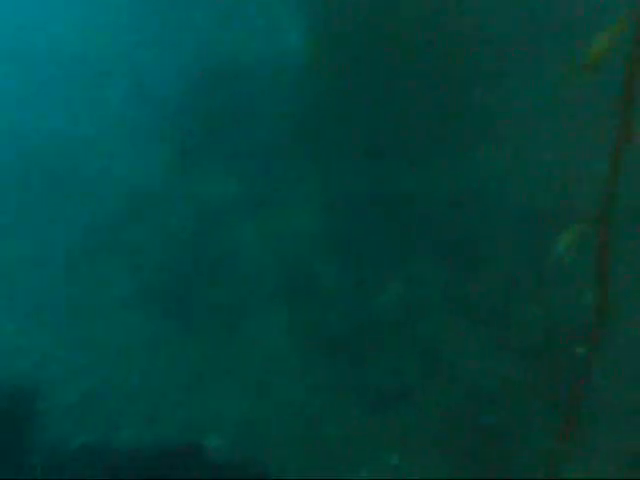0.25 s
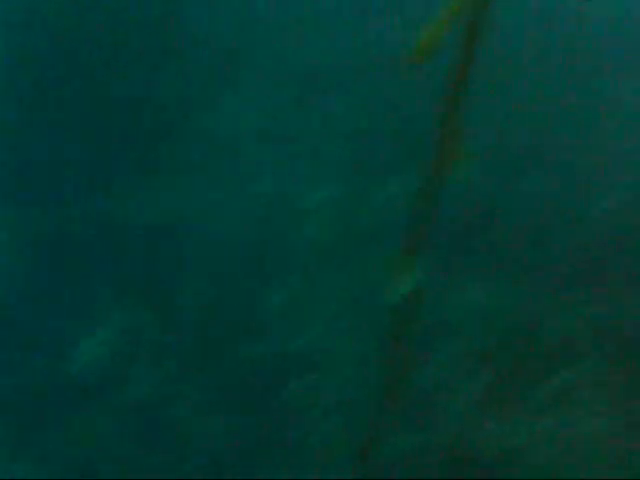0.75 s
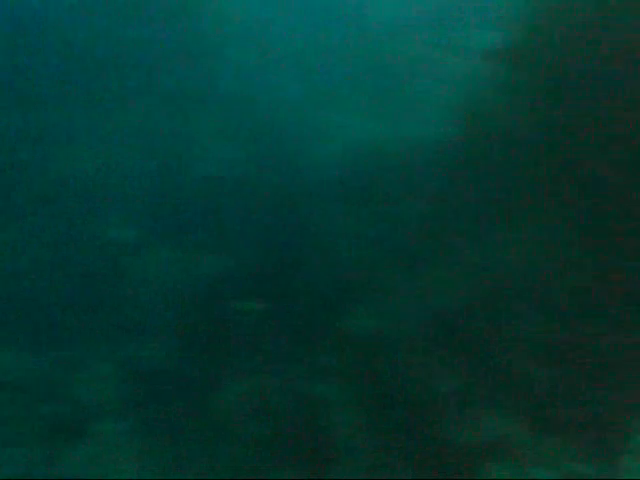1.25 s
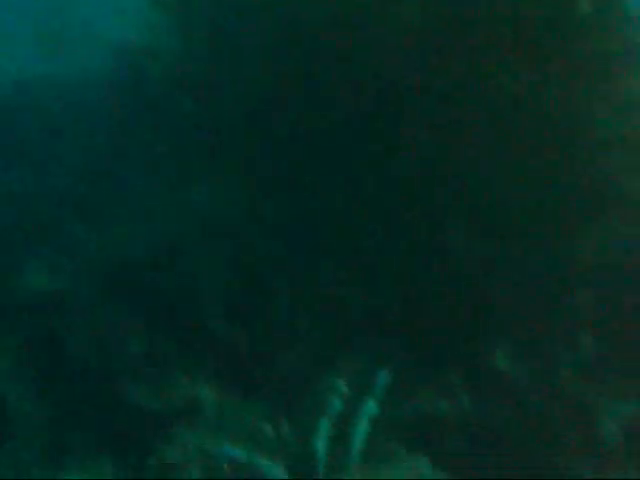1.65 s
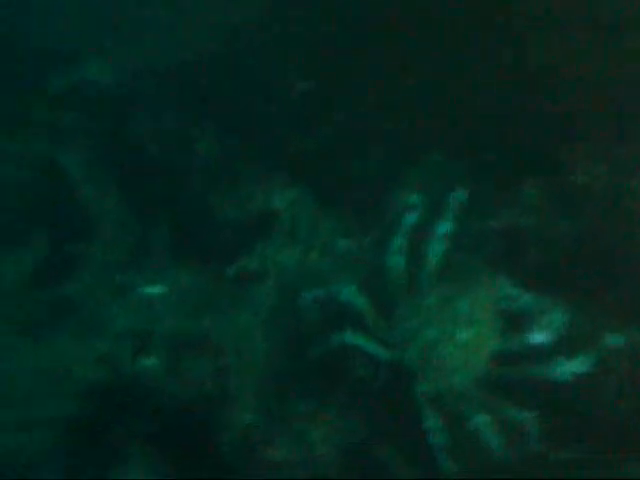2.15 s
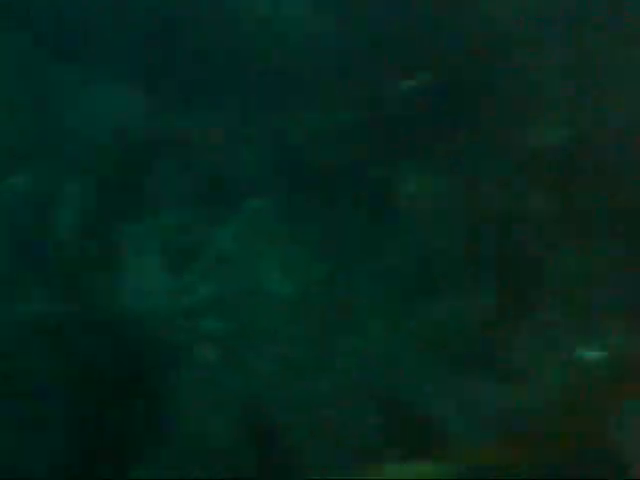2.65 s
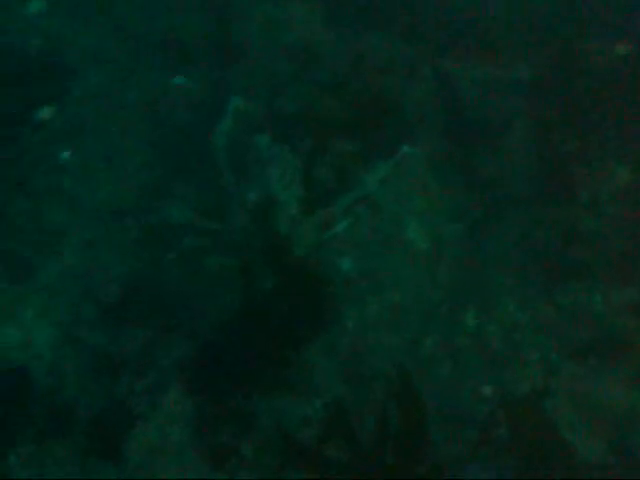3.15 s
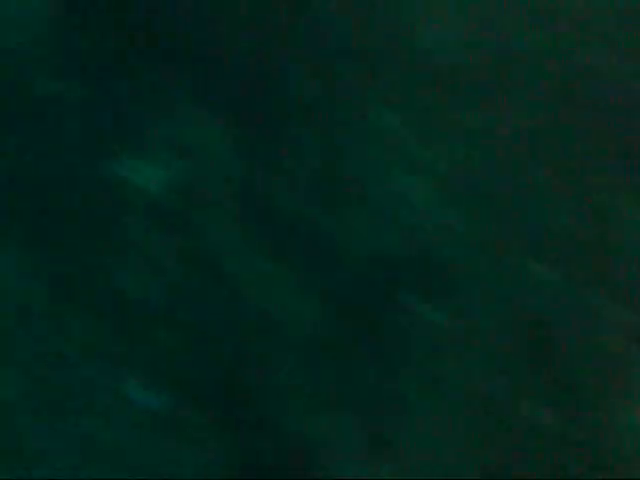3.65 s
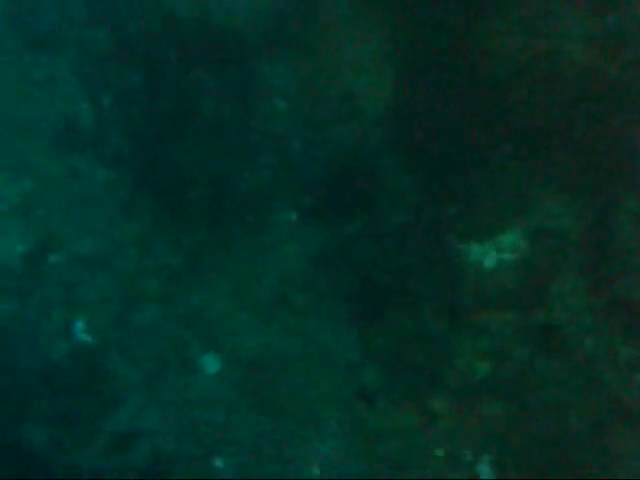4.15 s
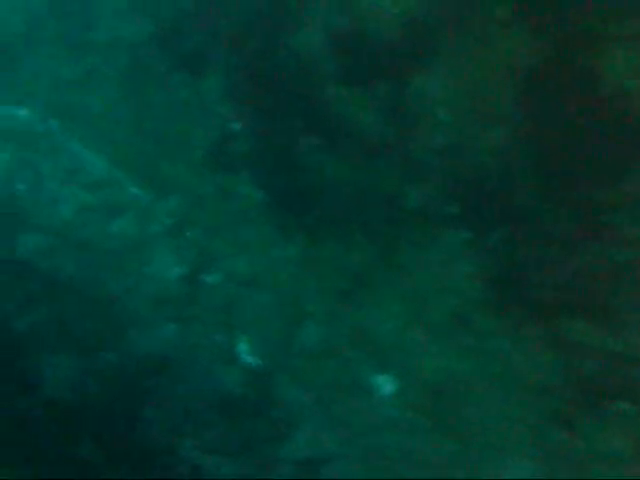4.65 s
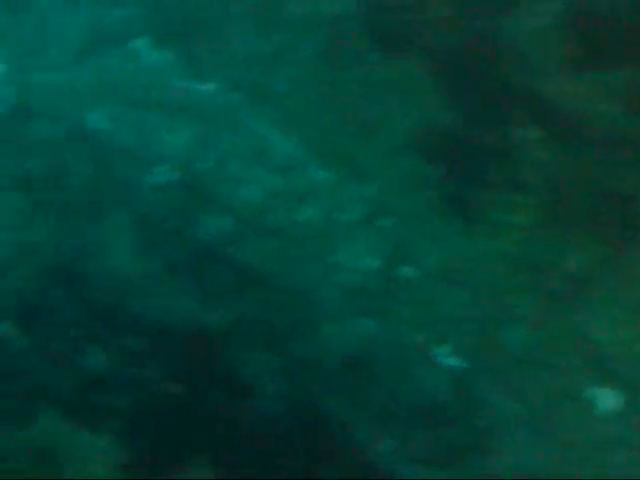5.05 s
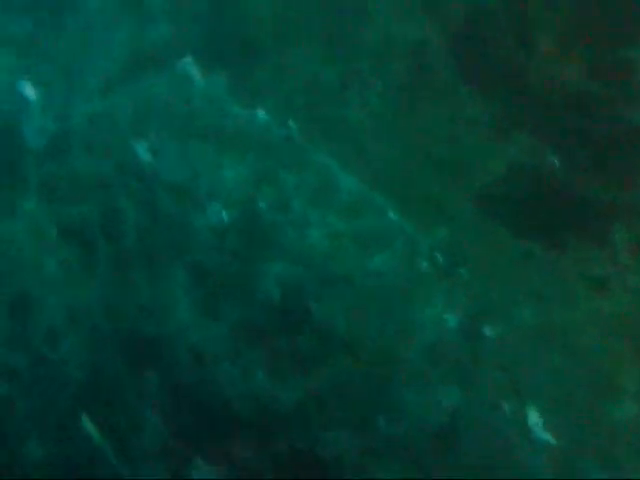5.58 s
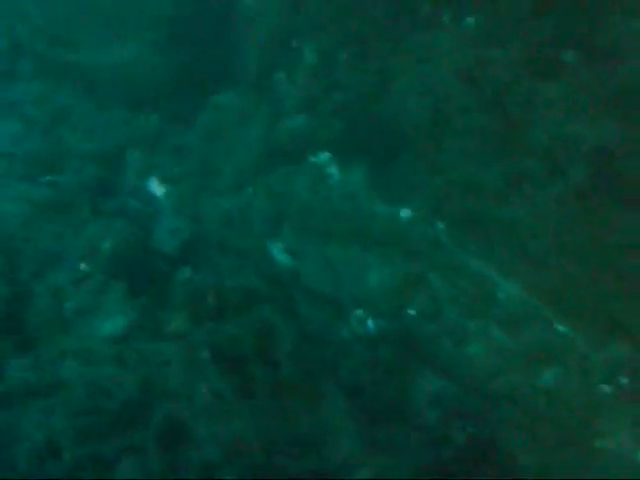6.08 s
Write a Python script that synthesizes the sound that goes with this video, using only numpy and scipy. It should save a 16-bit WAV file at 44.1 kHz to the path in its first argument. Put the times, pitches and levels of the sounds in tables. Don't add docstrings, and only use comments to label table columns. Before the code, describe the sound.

A microphone sealed inside a small underwater camera housing hears a steady, lumpy low hum, slow water surges and a thin far-off crackling hiss. From 0 s, close knocks, crisp snaps and tiny ticks rattle the shell irregularly, with hollow rings and dull gulps of trapped air. Between 1.5 and 2.5 s the knocks thicken and a panel booms softly. Around 2.6 to 2.75 s bubbles crowd past with quick overlapping gulps and a short creak; heavier knocks and bumps follow at 3.1, 3.4 and 3.55 s. It calms until about 4.5 s, leaving faint ticks. Snaps, creaks and a tight cluster of bumps return from 4.6 to 5.2 s, then a sparse lull. At 5.84 s a hard, deep thud overwhelms everything, with a weak rebound at 6 s and final clicks to 6.3 s. Everything is muffled yet digitally coarse, with gritty mirrored treble.

```python
import sys
import numpy as np
from scipy import signal
from scipy.fft import rfft, irfft, next_fast_len
from scipy.io import wavfile
from scipy.ndimage import uniform_filter1d

SR = 44100
rng = np.random.default_rng(int(sys.argv[2]) if len(sys.argv) > 2 else 0)


def magnitude_from_level(level_db):
    exponent = np.asarray(level_db, float) / 20
    return 10 ** exponent


def wrap_up_sound(samples):
    columns = np.atleast_2d(samples).T
    tamed = np.clip(columns, -1, 1)
    steps = np.round(tamed * 32767).astype(np.int16)
    wavfile.write(sys.argv[1], SR, steps)


N = 278712

# [t/s, level/dB, nearer the door/dB, sharpness/dB, cavity depth/dB]
KNOCKS = [(0.0249, -16, 4.5, 4.5, -1), (.7648, -28, 2, 5, -5), (0.9782, -18.5, -7, -30, 4.5),
          (1.641, -16.5, 1.5, -19, 1), (1.7608, -23, -0.5, -21, 2), (1.955, -20.5, -2, -7.5, 5.5),
          (2.0984, -20, -4.5, -4, -1), (2.405, -17, 0.5, -6.5, 1.5), (2.4223, -28, -9, -10, 7.5),
          (2.5252, -18, 2.5, -4, 2), (2.5979, -33.5, -4, 7, 18.5), (3.1299, -12.5, 0, -14, 5),
          (3.399, -14, -0.5, -11, 4), (3.5568, -12, -3.5, -4.5, 5.5), (3.5712, -28, 5, 4, 9),
          (3.5881, -25.5, -3, 7, 1), (4.9635, -28.5, -5, 5, 0), (4.9913, -24.5, -7, -23, 10),
          (5.0002, -27, 0, 4, 7.5), (5.0248, -19, -1, -9, 1.5), (5.1638, -25, -3, 1, -2)]


def rms_one(x):
    return x / np.sqrt(np.mean(x ** 2) + 1e-20)


def in_time(rows):
    s, *columns = np.transpose(rows)
    return [np.interp(np.arange(N) / SR, s, c) for c in columns]


def drift(rate_hz):
    r = np.exp(-2 * np.pi * rate_hz * 40 / SR)
    chance = rng.standard_normal(N // 40 + 2002)
    slow = signal.lfilter([1], [1, -2 * r, r * r], chance)[2000:]
    return np.interp(np.arange(N) / 40, np.arange(len(slow)), rms_one(slow))


def ring(x, hz, t60):
    r = magnitude_from_level(-60 / (t60 * SR))
    w = 2 * np.pi * hz / SR
    return signal.lfilter([0, np.sin(w)], [1, -2 * r * np.cos(w), r * r], x + 1e-18)


def bandpass(x, order, low_hz, high_hz):
    return signal.sosfilt(signal.butter(order, [low_hz, high_hz], "band", fs=SR, output="sos"), x)


def peak_one(bursts):
    return bursts / np.abs(bursts).max(axis=1, keepdims=True)


def colour(x, spectrum):
    hz, level_db = np.transpose(spectrum)
    size = next_fast_len(N)
    log_hz = np.log(np.arange(size // 2 + 1) * SR / size + 1)
    gain = magnitude_from_level(np.interp(log_hz, np.log(hz), level_db, left=-90, right=-90))
    return rms_one(irfft(rfft(x, size) * gain, size)[:N])


def grains(per_s, spread_db):
    sizes = magnitude_from_level(spread_db * np.minimum(rng.exponential(1, N), 4)) * rng.choice([-1, 1], N)
    return rms_one(sizes * (rng.random(N) < per_s / SR))


def place(seconds, shapes):
    out = np.zeros(N + shapes.shape[1])
    for s, shape in zip(seconds, shapes):
        start = round(s * SR)
        out[start:start + len(shape)] += shape
    return out[:N]


def pulses(rows, rise_cycles, glide, polarity):
    s, peak_db, hz, t60 = np.transpose(rows)[:, :, None]
    t = np.arange(9000) / SR
    rise = 1 - np.exp(-(t * hz / rise_cycles) ** 2)
    swell = rise * magnitude_from_level(-60 * t / np.maximum(t60, .005))
    wave = polarity * np.sin(2 * np.pi * hz * t * (1 + glide * t / t60)) * swell
    return place(s[:, 0], wave * magnitude_from_level(peak_db) / swell.max(axis=1, keepdims=True))


def surge(level_db):
    # [f/Hz, level per Hz/dB]
    spectrum = [(12, -39), (20, -9.5), (30, -9), (49, -12), (102, -12), (170, -30.5), (220, -19),
                (370, -120)]
    return magnitude_from_level(level_db + 2.5 * drift(9)) * colour(rng.standard_normal(N), spectrum)


def rustle(level_db):
    # [f/Hz, level per Hz/dB]
    spectrum = [(290, -54), (500, -24), (555, -2), (644, -7), (786, -2), (880, -3), (1110, -3),
                (1210, -13.5), (1320, -2), (1550, -14), (1960, -5), (2460, -10), (3140, -14.5), (3630, -4),
                (4000, -7.5), (5200, -38), (8800, -120)]
    smear = np.exp(-1 / (0.0069 * SR))
    envelope = signal.lfilter([1], [1, -smear], np.abs(grains(90, spread_db=2.1)))
    far = envelope * magnitude_from_level(3.0 * drift(2.3)) * rng.standard_normal(N)
    thin = signal.sosfilt(signal.butter(1, 1600, "high", fs=SR, output="sos"), far)
    hiss = magnitude_from_level(2.4 * drift(41)) * rng.standard_normal(N)
    return magnitude_from_level(level_db) * colour(1.83 * rms_one(thin) + hiss, spectrum)


def hum(level_db):
    # [f/Hz, level per Hz/dB]
    spectrum = [(82, -28), (140, -9.5), (309, -6), (377, -2), (425, 2.5), (543, -14.5), (650, -23),
                (840, -71), (1430, -120)]
    push = (grains(900, spread_db=3.0) + 0.61 * rng.standard_normal(N)) * magnitude_from_level(1.16 * drift(40))
    cavity = rms_one(ring(push, hz=408, t60=.06))
    return magnitude_from_level(level_db) * rms_one(colour(push, spectrum) + 0.46 * cavity)


def bubbles():
    # [t/s, peak level/dB, f/Hz, t60/s]
    leaving = [
        (1.526, -36, 750, 0.05),
        (5.958, -35, 625, 0.037),
    ]
    return pulses(leaving, rise_cycles=3.4, glide=0.25, polarity=0.98)


def rings():
    # [t/s, peak level/dB]
    passing = [(.1105, -16), (0.2756, -18), (0.37, -12.5), (0.5059, -17.5), (0.5497, -18), (.764, -17),
               (.923, -25), (1.26, -23.5), (1.5104, -26), (1.6726, -23), (2.142, -23), (2.2728, -19.5),
               (2.6327, -13), (2.6476, -9), (2.6802, -11.5), (2.696, -21.5), (2.7201, -23), (3.1058, -17.5),
               (3.9124, -29), (3.9389, -26), (4.5964, -18), (4.7507, -19), (4.908, -27), (5.105, -24),
               (6.1651, -24)]
    lead_s, pitch_hz, spread, t60_s = 0.00514, 392, 0.026, .05
    rows = [(s - lead_s, db, pitch_hz * (1 + spread * rng.uniform(-1.14, 1)), t60_s) for s, db in passing]
    return pulses(rows, rise_cycles=2.15, glide=.02, polarity=-0.79)


def sudden(rows):
    return pulses(rows, rise_cycles=0.27, glide=0.037, polarity=-1.324)


def gulps():
    # [t/s, peak level/dB, f/Hz]
    swallowed = [(0.6584, -14, 310), (0.844, -20, 296), (1.758, -15, 295), (1.7725, -21, 252),
                 (1.7843, -30, 280), (1.8855, -34, 262), (2.183, -20, 340), (2.44, -23, 373),
                 (2.6091, -11, 340), (2.619, -13, 363), (2.626, -11.5, 350), (2.9489, -22, 317),
                 (2.9747, -21, 325), (3.4509, -24, 346), (3.5323, -24, 357), (3.805, -22.5, 328),
                 (4.2918, -23, 246), (4.9222, -25, 340), (4.9474, -15, 314), (5.2397, -23, 358),
                 (6.0246, -22, 336)]
    decay_cycles = 7.6
    return sudden([(s, db, hz, decay_cycles / hz) for s, db, hz in swallowed])


def panel_booms():
    # [t/s, peak level/dB, f/Hz, t60/s]
    booms = [
        (1.762, -20, 221.5, 0.13),
        (1.885, -23, 227, 0.1),
        (2.261, -23.5, 223, 0.19),
    ]
    return sudden(booms)


def cavity_knocks():
    delay_s, pitch_hz, t60_s = 0.00025, 394, 0.03
    return sudden([(s + delay_s, db + depth, pitch_hz, t60_s) for s, db, _, _, depth in KNOCKS])


def bumps():
    # [t/s, peak level/dB, f/Hz]
    flexes = [(.0231, -27.5, 161), (0.3694, -27, 121), (0.6563, -23, 107), (0.975, -23.5, 97),
              (1.5844, -26.5, 122), (1.6394, -23, 84), (1.762, -23.5, 99), (1.9532, -26, 109),
              (2.4387, -22.5, 126), (2.533, -20.5, 90), (2.5634, -24, 104), (2.637, -23, 122),
              (3.1271, -22.5, 92), (3.3968, -21.5, 96), (3.5685, -20.5, 82), (3.7623, -21.5, 101),
              (4.9226, -21.5, 126), (4.9485, -17, 116), (4.9936, -13.5, 131), (5.0255, -24, 101),
              (5.0734, -27, 106)]
    t60_s = 0.032
    return pulses([(*row, t60_s) for row in flexes], rise_cycles=0.4, glide=0.0083, polarity=-1.18)


def contact(s, wall_db, door_db, port_db, latch_db, reach):
    return (s, *np.add((wall_db, door_db, port_db, latch_db, 0), reach))


def body_contacts():
    # [t/s, level/dB, nearer the door/dB, sharpness/dB]
    taps = [(.0339, -24.5, 4, -2), (.6666, -18, 3, -1.5), (1.423, -24.5, -1.5, -3.5),
            (1.585, -26.5, -7, -1), (2.3233, -32.5, 5, 1), (2.3495, -31.5, 0, 1),
            (2.9153, -23.5, 3.5, -0.5), (3.1434, -30, -4, 9.5), (3.4899, -25.5, 1, -11),
            (3.5477, -28, 7, -7), (3.6089, -26, -1, -7), (4.7398, -25, 1, -2.5), (4.7451, -36, -7, -5),
            (4.9257, -27.5, 11, 3), (4.9374, -26, -3, -6), (4.9793, -11.5, 2.5, -5.5),
            (5.1458, -28.5, 1, 4), (6.287, -25, 5.5, 5)]
    # wall dB, door dB, port dB, latch dB, slip ms
    knock_reach, tap_reach = (-0.7, 1.35, -4, -18.5, 2.7), (-0.7, 0.2, -2.6, -13, 2.63)
    found = []
    for rows, reach in ((KNOCKS, knock_reach), (taps, tap_reach)):
        for s, db, door, sharp, *_ in rows:
            found.append(contact(s, db - door / 2, db + door / 2, db + sharp, db + sharp, reach))
    return found


def front_contacts():
    # [t/s, level/dB, nearer the latch/dB, depth/dB]
    snaps = [(0.3292, -12, -14, -0.5), (0.4751, -28, -4, 8.5), (1.0473, -14, 1, 2), (1.709, -18, 2, 1),
             (1.9224, -21, -3, 2), (2.0689, -21, 0.5, 6.5), (2.1358, -24, 1.5, 5),
             (2.1578, -17.5, 1.5, 7.5), (2.2253, -12, -7.5, -3), (2.715, -18.5, -4.5, -6),
             (2.88, -20, -2, 0), (3.038, -12.5, 1, -0.5), (3.3305, -26, 1.5, 1), (3.4527, -21, -6, -1),
             (3.9624, -20.5, 0.5, 2.5), (4.0296, -22, -6.5, -2), (4.57, -13, 0, 2.5),
             (4.8896, -10, -12, -4), (5.089, -20.5, 0, 4.5), (6.06, -27.5, 7, 2), (6.192, -22.5, -13, 5),
             (6.2224, -24, -1, -7), (6.234, -11.5, 1, 2.5)]
    # [t/s, level/dB]
    faint_ticks = [(.0958, -29), (.1694, -28.5), (.449, -33), (.8248, -29), (1.1627, -24.5),
                   (1.1823, -29.5), (1.2984, -28.5), (1.3478, -27), (1.366, -33), (1.4604, -27.5),
                   (1.986, -30.5), (2.1947, -30), (2.9576, -30.5), (3.6765, -32.5), (3.7782, -30),
                   (4.0687, -33.5), (4.212, -33), (4.2311, -31), (4.591, -44), (4.619, -35.5),
                   (5.2387, -28.5), (5.259, -35), (5.343, -33), (5.417, -31), (5.472, -35), (5.6428, -29.5),
                   (5.704, -38), (5.7414, -31)]
    # [t/s, level/dB]
    latch_ticks = [(.1833, -28), (.2992, -31.5), (.9278, -28), (1.278, -30), (1.697, -41), (1.8647, -26.5),
                   (2.2422, -29), (3.086, -25.5), (3.914, -35), (4.0482, -36), (4.103, -29.5), (4.368, -35),
                   (4.48, -34), (5.1952, -28.5), (5.625, -31.5), (5.966, -39), (6.13, -35), (6.276, -29)]
    # [t/s, level/dB]
    port_ticks = [(.5745, -30), (.7337, -28), (1.338, -32), (2.563, -46), (2.666, -38), (3.187, -30),
                  (3.47, -34), (3.517, -39), (3.982, -31), (5.5162, -31), (5.788, -27.5), (5.984, -39)]
    # wall dB, door dB, port dB, latch dB, slip ms
    snap_reach, faint_reach = (-15, -12.5, 2.3, 1.57, 0.22), (-13, -18.5, 0.1, -1, 2.4)
    latch_reach, port_reach = (-47, -44, -15, -2.7, 0), (-12, -8, 2.1, -11, 2.7)
    found = [contact(s, db + depth, db + depth, db, db + latch, snap_reach) for s, db, latch, depth in snaps]
    for rows, reach in ((faint_ticks, faint_reach), (latch_ticks, latch_reach), (port_ticks, port_reach)):
        found += [contact(s, db, db, db, db, reach) for s, db in rows]
    return found


def creaks():
    # [t/s, level/dB, slip length/ms]
    slips = [(0.6552, -30.5, 12), (1.0205, -30, 39), (1.51, -29, 10.5), (2.6917, -23, 19),
             (2.748, -35.5, 12), (2.854, -25, 1.2), (4.4448, -28, 8), (4.645, -32.5, 9.3),
             (4.8714, -25, 5.1), (4.9046, -22.5, 15), (6.074, -29, 5.2)]
    return [contact(s, db, db, db, db, (-8, -5, 0, -7.5, ms)) for s, db, ms in slips]


def shell_part(burst, modes):
    part = sum(magnitude_from_level(mode_db) * ring(burst, hz, t60) for hz, mode_db, t60 in modes)
    return peak_one(bandpass(part, 1, modes[0][0], 1.07 * modes[-1][0]))


def slap(slip, low_hz, high_hz, level_db):
    return peak_one(bandpass(slip, 2, low_hz, high_hz)) * magnitude_from_level(level_db)[:, None]


def ticks():
    # [f/Hz, level/dB, t60/s]
    wall = [(600, -2.5, 0.012), (873, 7, 0.01)]
    # [f/Hz, level/dB, t60/s]
    door = [(1113, 0, 0.016), (1265, 0, 0.015)]
    # [f/Hz, level/dB, t60/s]
    port = [(2005, 7.5, 0.0081), (2370, -3.5, 0.003), (2764, -2, 0.0066)]
    # [f/Hz, level/dB, t60/s]
    latch = [(3612, -3, 0.0097), (3860, -26, 0.0066)]
    rise_s, creep_s, creep_db = 0.00029, 0.0042, -13.5
    s, *part_db, slip_ms = np.transpose(body_contacts() + front_contacts() + creaks())
    wall_db, door_db, port_db, _ = part_db
    t = np.arange(2600) / SR
    noise, grit, ragged = rng.standard_normal((3, len(s), len(t)))
    fade = np.exp(-1000 * t / np.maximum(slip_ms, .1)[:, None])
    slip = noise * (1 - np.exp(-t / rise_s)) * fade
    stick_slip = magnitude_from_level(96 * uniform_filter1d(ragged, size=90, axis=1))
    creep = grit * stick_slip * t * np.exp(-t / creep_s)
    shapes = slap(slip, 620, 2300, np.maximum(wall_db, door_db) - 9.5)
    shapes = shapes + slap(slip, 2210, 3530, port_db - 13)
    for modes, level_db, trim_db in zip((wall, door, port, latch), part_db, (2.27, 0.4, 2.6, 5.57)):
        part = shell_part(slip, modes) + magnitude_from_level(creep_db) * shell_part(creep, modes)
        shapes = shapes + part * magnitude_from_level(level_db + trim_db)[:, None]
    return place(s, shapes)


def thuds():
    # [t/s, peak level/dB, f/Hz, t60/s]
    case_swing = [
        (5.8408, 3.5, 110, 0.053),
        (6.0055, -16, 100, 0.047),
    ]
    # [t/s, peak level/dB, f/Hz, t60/s]
    air_rap = [
        (5.8428, 0.5, 278, 0.021),
        (5.8475, -5, 203, 0.051),
        (6.0095, -20.5, 224, 0.035),
    ]
    swing = pulses(case_swing, rise_cycles=1.5, glide=.001, polarity=0.79)
    return swing + pulses(air_rap, rise_cycles=0.55, glide=0.0079, polarity=0.71)


def scene():
    # [t/s, level/dB]
    flow = [
        (0.0, -32.5),
        (1.34, -34),
        (2.67, -32),
        (4.1, -35),
        (5.0, -35.5),
        (5.51, -38),
        (5.97, -35.5),
        (6.32, -37.5),
    ]
    hum_db, = in_time(flow)
    swing = hum_db - hum_db.mean()
    water = surge(-44.5 + 1.2 * swing) + rustle(-45 + 0.3 * swing) + hum(hum_db)
    air = bubbles() + rings() + gulps() + panel_booms() + cavity_knocks()
    blows = bumps() + ticks() + thuds()
    return (water + air + blows)[None]


def low_pass(x):
    return signal.sosfilt(signal.butter(12, 16470, fs=SR, output="sos"), x)


def record(dry):
    sample_rate_hz, bottom, top, offset = 8000, -.94, .86, .011
    step_noise_db, top_cut_hz = -37, 15550
    slow = np.clip(signal.resample_poly(dry[0], 80, 441), bottom, top)
    slope = uniform_filter1d(np.abs(np.gradient(slow)), size=9)
    slow = slow + magnitude_from_level(step_noise_db) * slope * rng.standard_normal(len(slow))
    held = slow[np.arange(N) * sample_rate_hz // SR]
    cut = signal.sosfilt(signal.cheby2(14, 40, top_cut_hz, fs=SR, output="sos"), held)
    return low_pass((cut + offset)[None])


dry = scene()
out = record(dry)
wrap_up_sound(out)
```